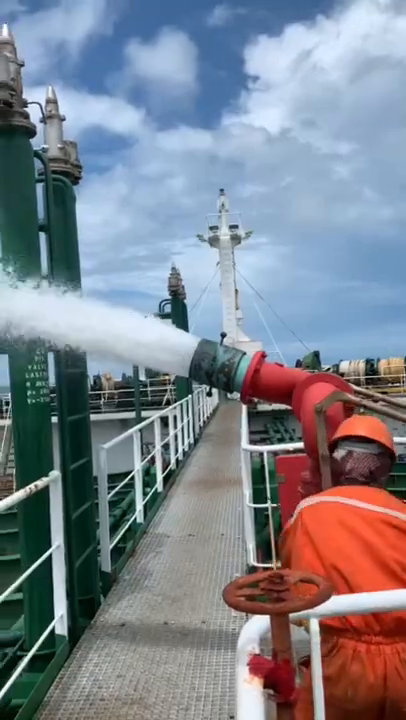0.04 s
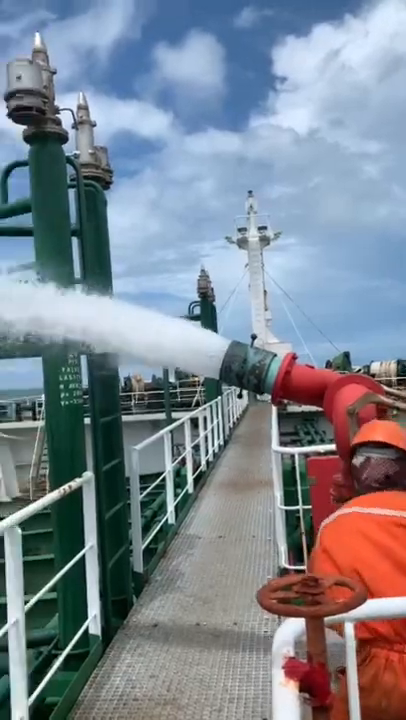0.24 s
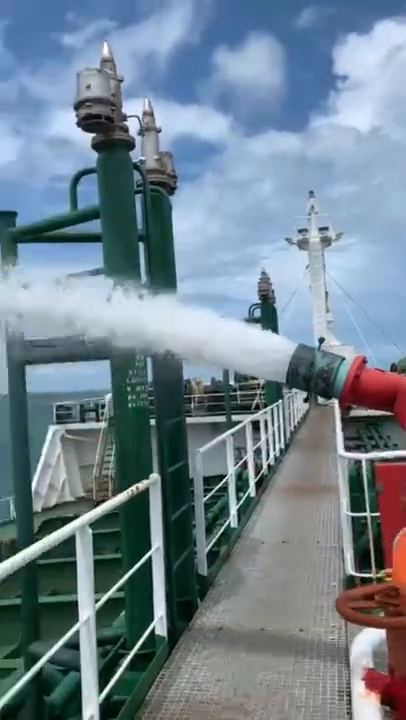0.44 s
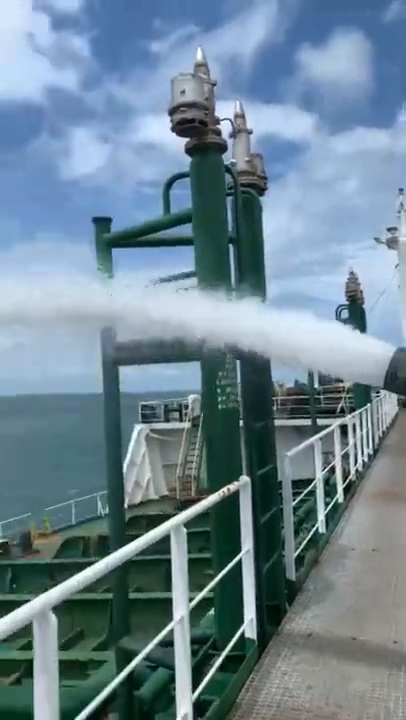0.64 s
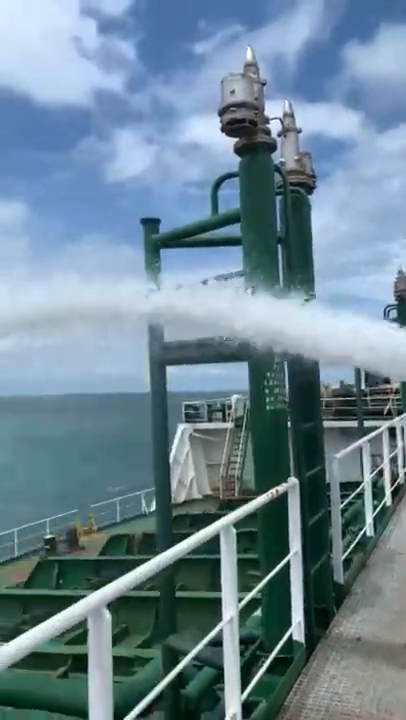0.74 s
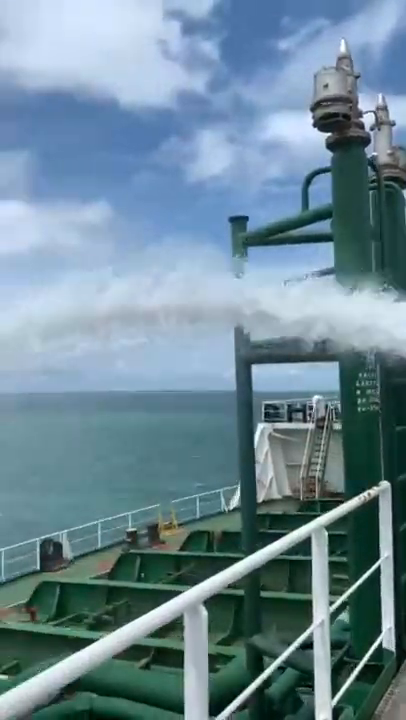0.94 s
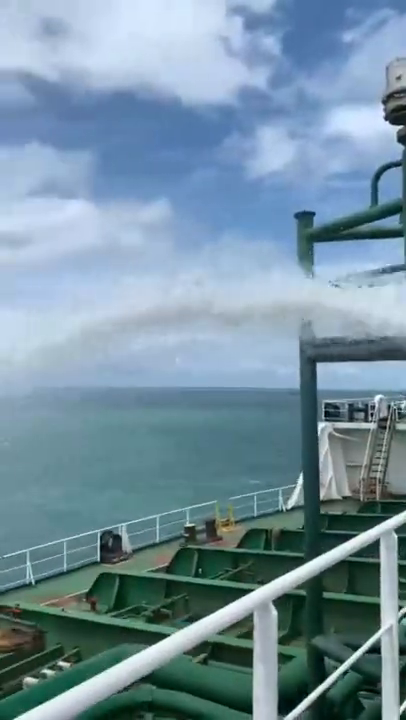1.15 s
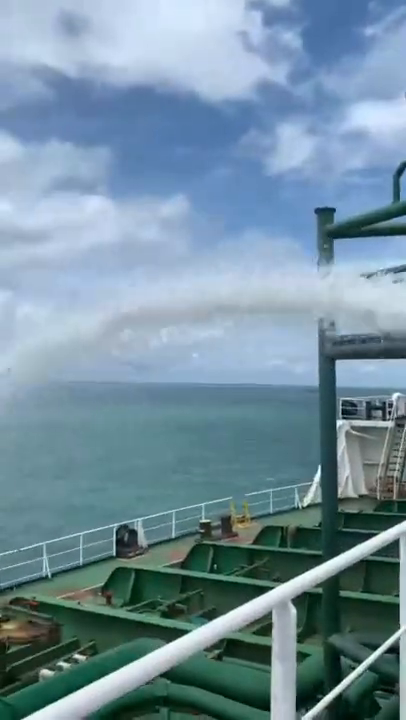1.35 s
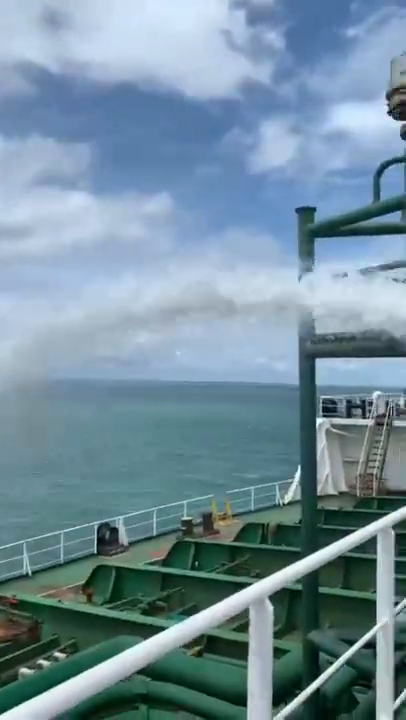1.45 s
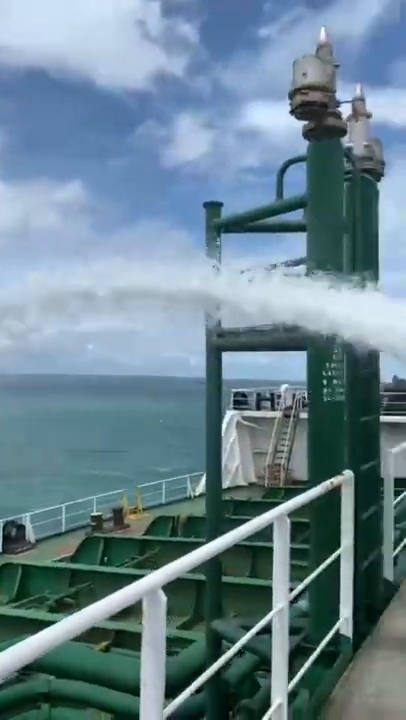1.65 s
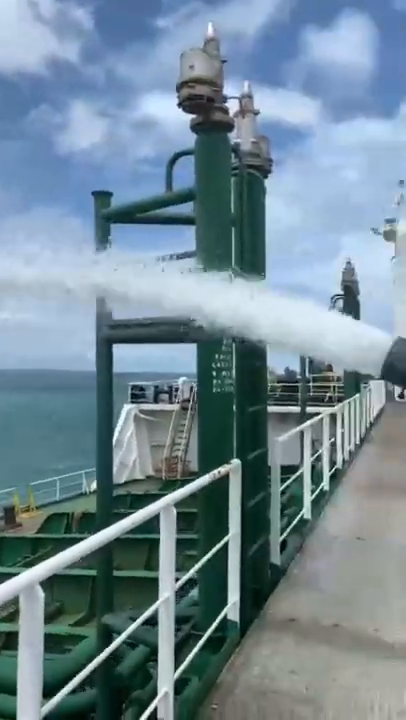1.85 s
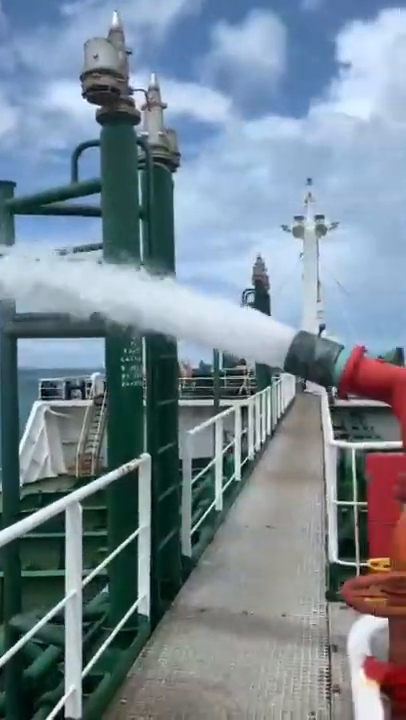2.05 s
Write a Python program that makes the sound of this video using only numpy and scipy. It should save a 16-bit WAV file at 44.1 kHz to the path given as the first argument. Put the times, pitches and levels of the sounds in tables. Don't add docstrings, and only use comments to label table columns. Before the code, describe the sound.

A hard water jet sprays continuously for about 2 seconds, a flat, bright, gently surging hiss with fine droplet ticks and some deck echo. Short wet splashes land nearby between 0.45 and 1.4 s. Wind rumbles in the centre in irregular puffs, strongest and brighter from about 1.3 to 1.8 s, easing at the end. Faint low ship machinery drones throughout; the wide spray image shifts as the phone pans.

```python
import sys
import numpy as np
from scipy import signal
from scipy.fft import rfft, irfft
from scipy.io import wavfile
from scipy.ndimage import uniform_filter1d

SR = 44100
rng = np.random.default_rng(int(sys.argv[2]) if len(sys.argv) > 2 else 0)


def voltage_ratio(level):
    return 10 ** (np.asarray(level, float) / 20)


def transcribe(signal):
    frames = np.atleast_2d(signal).T
    limited = np.clip(frames, -1, 1)
    pcm = np.round(limited * 32767).astype(np.int16)
    wavfile.write(sys.argv[1], SR, pcm)


N = 92610

# (time [s], level [dB], spectral tilt [dB per octave], echo off the deck [dB])
JET_COURSE = [(0.0, -39, -0.4, -11), (0.18, -40, -1, -7.5), (0.23, -32.5, 0.7, -1),
              (0.27, -37.5, -0.7, -9.5), (0.58, -35.5, -1.4, 2), (0.61, -37, 0.7, -11),
              (0.85, -35, 0.2, -7), (1.03, -34.5, -0.5, -12), (1.11, -34, 2.4, -18.5),
              (1.16, -34.5, 0.6, -7), (1.23, -35.5, 2, -14), (1.27, -33, 0.5, 3), (1.33, -33, -2.36, -14.5),
              (1.7, -34.5, 0.4, 1), (1.77, -35, -0.2, -24), (1.78, -36, -0.1, -9), (2.01, -37.5, -0.5, 3),
              (2.1, -37.5, -0.5, -4)]


def unit(x):
    return x / np.sqrt(np.mean(x ** 2))


def column(table, at, index, log=False):
    rows = np.array(table, float)
    if log:
        return np.interp(np.log(at + 1e-9), np.log(rows[:, 0]), rows[:, index])
    return np.interp(at, rows[:, 0], rows[:, index])


def band(x, hz, octaves):
    f = np.fft.rfftfreq(N, 1 / SR) + 1e-9
    bell = np.exp(-0.5 * (np.log2(f / hz) / octaves) ** 2)
    return irfft(rfft(x) * bell, N)


def noise_band(hz, octaves):
    return unit(band(rng.standard_normal(N), hz, octaves))


def walk(rate):
    hold = int(SR / rate)
    held = rng.standard_normal(2000)[np.arange(N) // hold]
    return 1.3 * uniform_filter1d(uniform_filter1d(held, hold), hold)


def bump(t, start, length):
    u = np.clip((t - start) / length, 0, None) * 3
    return u * np.exp(1 - u)


def spray(t):
    # (frequency [Hz], density [dB per Hz])
    jet_colour = [(200, -1.5), (900, -4.5), (2000, -0.66), (4500, -1), (6800, -3), (8200, -2.1),
                  (11000, 1.5)]
    jet_db, surge_db, flicker_db = 6, 1, 1.0
    drops_db, drop_scatter_db = -50, 2.5
    level_db = column(JET_COURSE, t, index=1)
    tilt_db = column(JET_COURSE, t, index=2)
    surge = surge_db * walk(15.0)
    hiss = 0
    for hz in 180 * 2 ** np.arange(0, 6.6, 0.5):
        db = column(jet_colour, hz, index=1, log=True) + 10 * np.log10(hz / 20000)
        db = db + level_db + tilt_db * np.log2(hz / 8000)
        db = db + surge + flicker_db * walk(22.2)
        hiss = hiss + voltage_ratio(db + jet_db) * noise_band(hz, octaves=0.25)
    hits = (rng.random(N) < 0.004) * rng.standard_normal(N)
    clicks = hits * voltage_ratio(drop_scatter_db * rng.exponential(size=N))
    return hiss + voltage_ratio(drops_db) * unit(band(clicks, 1670, octaves=0.86))


def splashes(t):
    # (time [s], level [dB])
    splash_events = [(0.226, -47), (0.468, -24), (.505, -35), (0.61, -31.5), (0.779, -30.5), (0.817, -35.5),
                     (0.947, -37), (1, -28), (1.074, -33), (1.327, -26), (1.39, -25)]
    splash_hz, splash_s = 1850, 0.0067
    shape = sum(voltage_ratio(db) * bump(t, s - splash_s / 3, splash_s) for s, db in splash_events)
    return shape * noise_band(splash_hz, octaves=0.94)


def ports(near, loose, phases):
    # (frequency [Hz], share [dB])
    echo_share = [(900, -1), (1500, -9), (2400, -4), (3350, -11), (4000, -4), (4900, -17), (6100, -7),
                  (7200, -20), (11500, -18)]
    f = np.fft.rfftfreq(N, 1 / SR)
    turn = np.exp(-0.5j * column(phases, f, index=1))
    share = np.clip(voltage_ratio(column(echo_share, f, index=1)) ** 2, 0, 1)
    direct = rfft(near) * np.sqrt(1 - share)
    left = direct * turn + rfft(loose[0]) * np.sqrt(share)
    right = direct / turn + rfft(loose[1]) * np.sqrt(share)
    return np.array([irfft(left, N), irfft(right, N)])


def wind(t):
    # (time [s], level [dB], brightness [dB per octave])
    wind_course = [(0.0, -26, -0.5), (0.29, -22.5, -1.5), (0.33, -12.5, -1.5), (0.53, -22, 0),
                   (0.58, -19, -1.5), (0.74, -20, 0.5), (0.79, -11, -2.8), (0.85, -21, 0.2),
                   (1.02, -14.5, -2.5), (1.05, -19, -1), (1.13, -10, -3), (1.18, -17, 0.9),
                   (1.31, -5.5, 0.44), (1.37, -17.5, 4.7), (1.51, -9, -1), (1.745, -4.5, 1.5),
                   (1.765, -22, 5), (2.1, -44, -8.5)]
    # (time [s], peak [dB], length [s], brightness [dB per octave])
    puff_events = [(0.308, -8, 0.011, -5), (0.332, -39, 0.01, 3), (0.38, -38, 0.026, 6),
                   (0.422, -16.5, 0.0083, 10), (0.478, -25.5, 0.018, 7), (0.553, -18, 0.021, -6),
                   (0.569, -15, 0.018, 3), (0.634, -12.5, 0.043, -5.5), (0.725, -22, 0.029, 6),
                   (0.786, -14, 0.022, -2.5), (0.89, -21.5, 0.028, -3.5), (0.934, -12, 0.018, 2),
                   (1.006, -11, 0.011, 8), (1.081, -14.5, 0.01, 4.5), (1.128, -10, 0.019, 7),
                   (1.215, -21, 0.017, -9), (1.241, -22, 0.035, 19.5), (1.274, -25.5, 0.015, 24),
                   (1.297, -29, 0.018, 4), (1.31, -22.5, 0.065, 8), (1.402, -2.5, 0.02, 3),
                   (1.446, -5.5, 0.0083, -3.5), (1.495, -3, 0.0096, 1.5), (1.52, -3, 0.012, 6.5),
                   (1.539, -7, 0.03, 5), (1.587, -11.5, 0.037, 10), (1.626, -1.5, 0.046, 3.5),
                   (1.659, -19, 0.036, -3), (1.696, -16, 0.017, 4), (1.723, -13, 0.017, 4),
                   (1.745, -10.5, .012, -5.5), (1.798, -6.5, 0.029, 2.5), (1.847, -24, .008, 11),
                   (1.927, -13.5, 0.019, 4), (1.951, -11.5, 0.018, 2), (0.327, -12.5, 0.022, 0),
                   (0.436, -14.5, 0.013, -4), (0.446, -23, .012, -6), (0.593, -11.5, .012, -4),
                   (0.665, -10.5, 0.0063, -7.5), (0.767, -14, 0.016, -0.5), (0.814, -14, 0.0092, 5.5),
                   (0.898, -13.5, 0.017, -1.5), (0.959, -11.5, 0.01, -4), (1.13, -12, 0.015, -11.5),
                   (1.301, -10.5, 0.0069, 2), (1.34, -31, 0.0093, 10), (1.486, 2, 0.0095, 0.5),
                   (1.553, -7.5, 0.019, 2)]
    # (frequency [Hz], density [dB per Hz], gain per wind level [dB per dB])
    wind_colour = [(30.4, -12.5, 0.64), (67.6, 0.1, 0.89), (191.4, -9, 0.9), (363, -13.5, 1.35),
                   (712, -25.5, 1.38), (1196, -34.5, 1.33), (2250, -53.5, 1.24)]
    steady_db, puff_db, ref_db, wind_db = -5, -7, -13, -18.5
    flutter_db, flutter_hz = 2.0, 60
    eddy_db, eddy_cycles = 1.5, 4.5

    puffs = np.array([voltage_ratio(db + puff_db) * bump(t, s - 0.003, max(length, 0.006))
                      for s, db, length, _ in puff_events])
    steady = voltage_ratio(column(wind_course, t, index=1) + steady_db)
    push = steady + puffs.sum(0)
    puff_bright = (puffs * np.array(puff_events)[:, 3:]).sum(0)
    bright = (steady * column(wind_course, t, index=2) + puff_bright) / push
    speed_db = 20 * np.log10(push) - ref_db + flutter_db * walk(flutter_hz)
    rumble = 0
    for hz in 40 * 2 ** np.arange(0, 6.5, 0.5):
        db = column(wind_colour, hz, index=1, log=True) + 10 * np.log10(hz / 100)
        db = db + bright * np.log2(hz / 200)
        db = db + column(wind_colour, hz, index=2, log=True) * speed_db
        db = db + eddy_db * walk(hz / eddy_cycles)
        gain = uniform_filter1d(voltage_ratio(db + wind_db), int(SR / hz))
        rumble = rumble + gain * noise_band(hz, octaves=0.31)
    return rumble


def hum():
    hum_hz, width_hz, hum_db = 267, 62, -39.5
    return voltage_ratio(hum_db) * noise_band(hum_hz, octaves=width_hz / hum_hz)


def scene():
    # (frequency [Hz], phase [rad])
    phases_away = [(3300, 9.42), (3950, 6.3), (4500, 4), (4850, 3.3), (5600, 3), (6100, 2.2)]
    # (frequency [Hz], phase [rad])
    phases_facing = [(900, 12.56), (1400, 12.1), (1900, 11), (2400, 10.2), (3100, 9.6), (3550, 9.3),
                     (4050, 6.3), (4700, 3.5), (5400, 2.9), (6050, 1.6)]
    # (frequency [Hz], phase [rad])
    phases_top = [(6600, .8), (7100, .2), (9500, -.2), (10150, -1), (10700, -2.1), (11200, -3.1)]
    # (time [s], share facing the nozzle [0-1])
    pan = [
        (0, 0.94),
        (.27, 0.89),
        (.36, 0.27),
        (.56, 0.23),
        (.62, 0.11),
        (1.22, 0),
        (1.4, 0.3),
        (1.78, 0.75),
        (2.1, 0.98),
    ]
    echo_db, wind_side_db = 14, -9.5
    t = np.arange(N) / SR
    echo = voltage_ratio(np.minimum(column(JET_COURSE, t, index=3) + echo_db, 2))
    near = spray(t) + splashes(t)
    loose = (echo * spray(t), echo * spray(t))
    facing = np.clip(column(pan, t, index=1), 0, 1)
    jet = facing * ports(near, loose, phases_facing + phases_top)
    jet = jet + (1 - facing) * ports(near, loose, phases_away + phases_top)
    gusts = wind(t)
    other = voltage_ratio(wind_side_db) * signal.hilbert(gusts).imag
    return jet + gusts + np.array([other, -other]) + hum()


def joint_stereo(mid, side):
    # (frequency [Hz], ratio [dB])
    step_ratios = [(200, 24), (700, 16), (1100, 10), (1600, 7), (5000, 8), (6300, 6), (8500, 11),
                   (11000, 8)]
    size, start, bins, band_share = 1024, 923, 560, 0.1
    mid_drop_db, side_drop_db, jitter_spread_db = -8, -8, 2.5

    window = signal.windows.kaiser_bessel_derived(2 * size, 4 * np.pi)
    pad = 2 * size - start
    pair = np.pad([mid, side], ((0, 0), (pad, 3 * size)))
    at = size * np.arange(pair.shape[1] // size - 1)[:, None] + np.arange(2 * size)
    phase = np.outer(np.arange(2 * size) + 0.5 + size / 2, np.arange(bins) + 0.5)
    basis = window[:, None] * np.cos(np.pi / size * phase)
    spec = pair[:, at] @ basis

    edges = [0]
    while edges[-1] < bins - 32:
        edges.append(edges[-1] + int(np.clip(edges[-1] * band_share, 4, 32)))
    widths = np.diff(edges + [bins])
    hz = np.array(edges) * SR / 2 / size

    power = np.add.reduceat(spec ** 2, edges, axis=2) / widths + 1e-18
    jitter_db = jitter_spread_db * rng.standard_normal(power.shape)
    lead_db = 10 * np.log10(power[0] / power[1]) + jitter_db[0]
    keep = np.array([lead_db > mid_drop_db, (-lead_db > side_drop_db) | (hz < 1500)])
    ratio_db = column(step_ratios, hz, index=1, log=True) + jitter_db[1]
    step = np.repeat(np.sqrt(power.max(0)) / voltage_ratio(ratio_db), widths, axis=1)
    whole = np.floor((abs(spec) / step) ** 0.75 + 0.4054) ** (4 / 3) * np.sign(spec)

    frames = (whole * step * np.repeat(keep, widths, axis=2)) @ basis.T * 2 / size
    out = np.zeros((2, len(at) + 1, size))
    out[:, :-1] += frames[..., :size]
    out[:, 1:] += frames[..., size:]
    return out.reshape(2, -1)[:, pad:pad + N]


def roll_off(x):
    return signal.sosfilt(signal.butter(12, 12200, fs=SR, output="sos"), x)


def record(dry):
    ceiling, top_hz, mono_below_hz = 0.9, 11750, 1004
    f = np.fft.rfftfreq(N, 1 / SR) + 1e-9
    rounded = ceiling * np.tanh(dry / ceiling)
    left, right = rfft(rounded) / (1 + (f / top_hz) ** 60)
    mid = irfft(left + right, N) / 2
    side = irfft((left - right) / (1 + (mono_below_hz / f) ** 12), N) / 2
    mid, side = joint_stereo(mid, side)
    return roll_off(np.array([mid + side, mid - side]))


dry = scene()
out = record(dry)
transcribe(out)
```